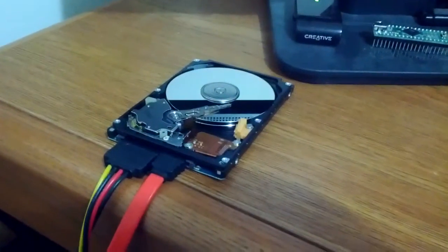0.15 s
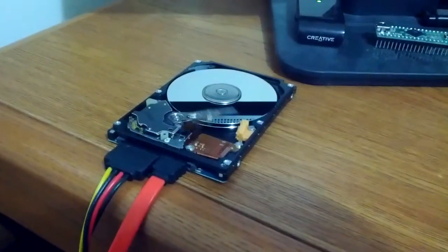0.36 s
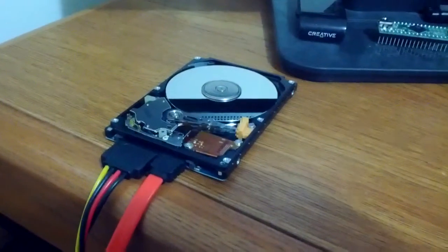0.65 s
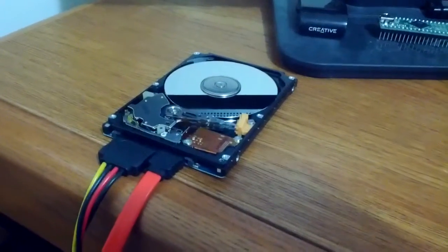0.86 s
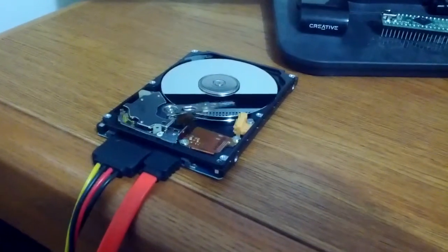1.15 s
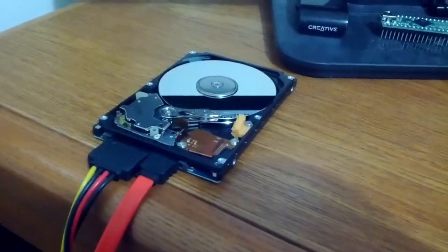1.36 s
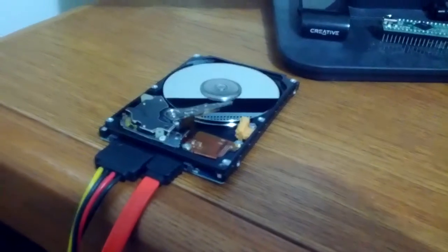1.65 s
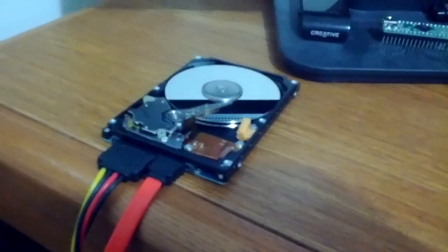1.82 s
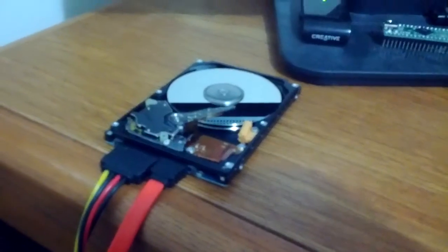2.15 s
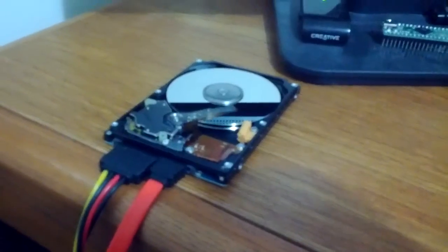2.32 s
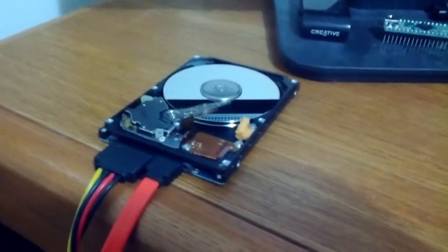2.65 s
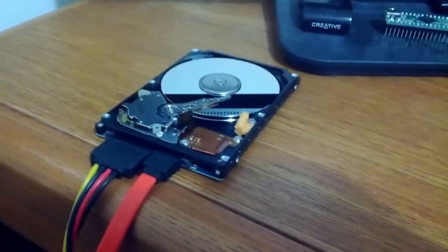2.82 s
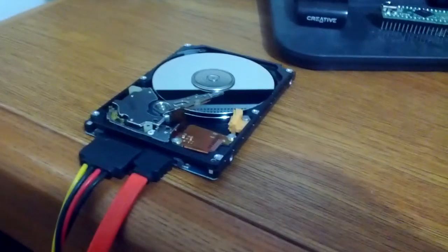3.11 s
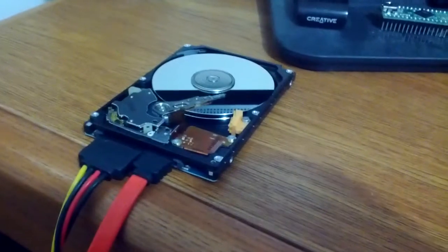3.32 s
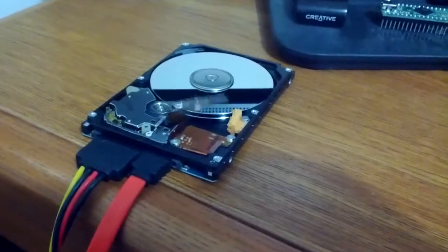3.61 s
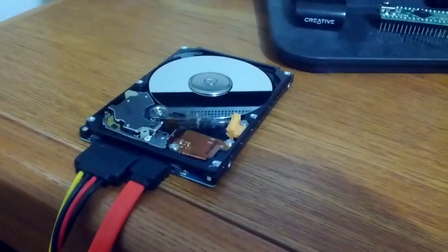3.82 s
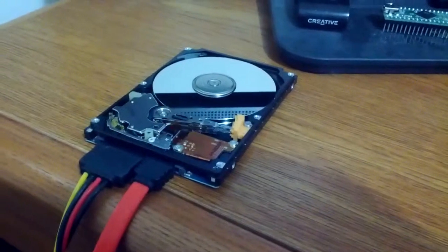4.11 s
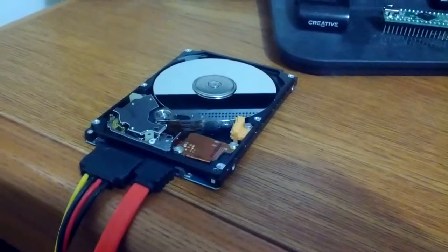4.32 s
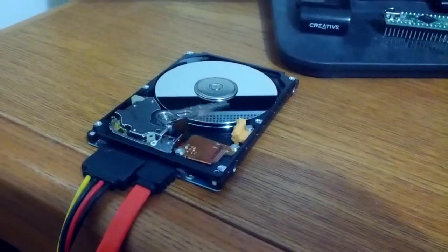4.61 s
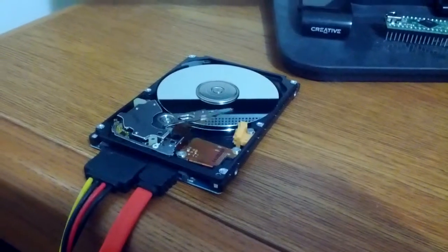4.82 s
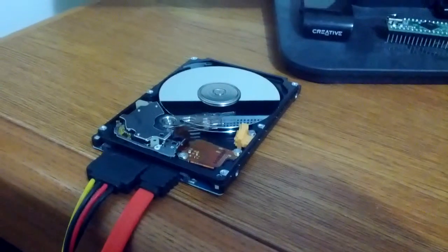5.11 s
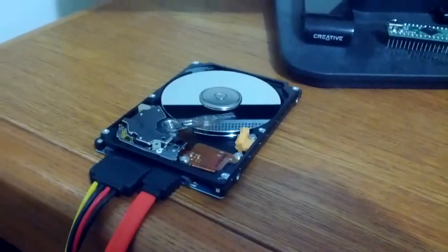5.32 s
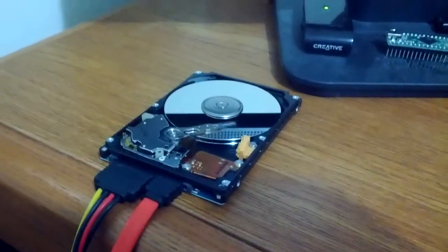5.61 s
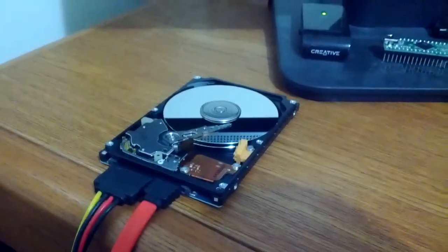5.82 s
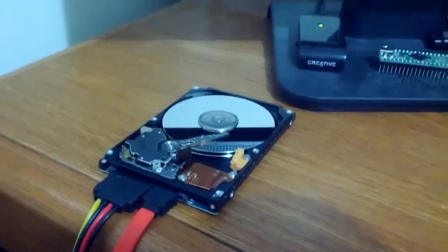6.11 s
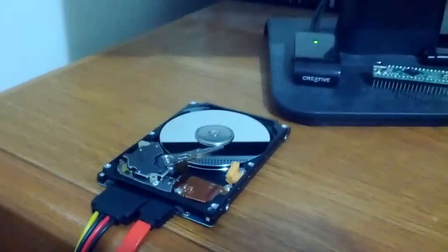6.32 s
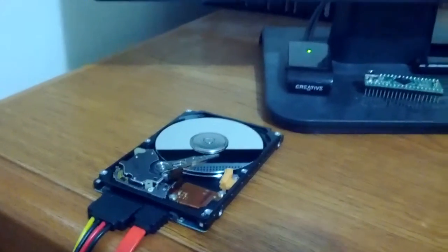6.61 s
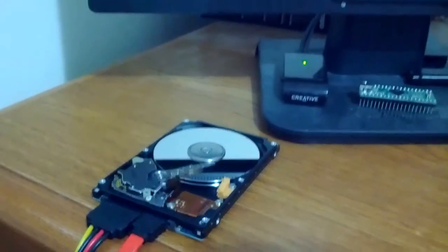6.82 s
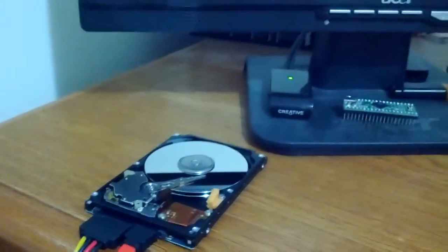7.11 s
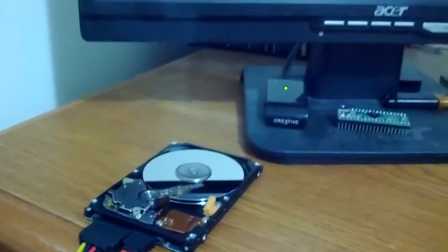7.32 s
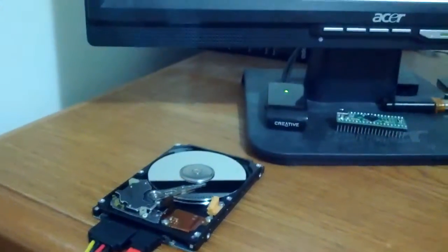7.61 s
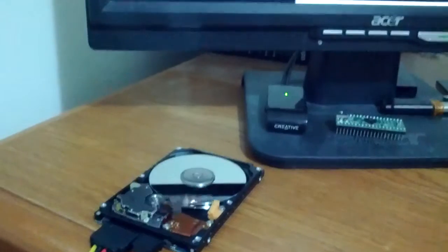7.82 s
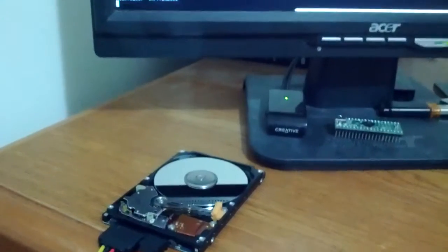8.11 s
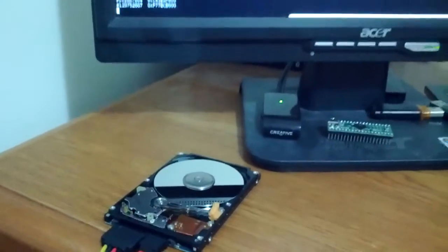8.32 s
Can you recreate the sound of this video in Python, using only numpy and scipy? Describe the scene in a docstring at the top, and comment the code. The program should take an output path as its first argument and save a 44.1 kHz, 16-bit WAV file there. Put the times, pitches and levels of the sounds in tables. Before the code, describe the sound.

An open hard drive knocks sharply about twice a second over a high scraping hiss, in three runs with quieter, whining pauses.

```python
"""An opened, failing hard drive, heard close up on a wooden desk beside a humming computer.
In three tries its heads scrape the platter, shaking their springs into a high hiss, while the arm
knocks on its stop and clacks as it turns round; each blow rings the arm and the casting.
Between tries the heads park: the motor whines, the arm ticks faintly and the coil chatters.
Fan hum, spindle rush and a few soft bumps lie underneath, and a small room answers the blows."""
import sys
import numpy as np
from scipy import signal
from scipy.fft import rfft, irfft, next_fast_len
from scipy.io import wavfile

SR = 44100
rng = np.random.default_rng(int(sys.argv[2]) if len(sys.argv) > 2 else 0)


def persist_wave(psi):
    """Save psi, clipped to +-1, as 16-bit WAV."""
    counts = np.round(np.clip(psi, -1, 1) * 32767).astype(np.int16)
    wavfile.write(sys.argv[1], SR, np.atleast_2d(counts).T)


N = 372761
TIME = np.arange(N) / SR
LIFT_S = 0.03  # the heads lift off this long before they reach the ramp

# The heads' tries on the platter. Each row: landing in seconds, return to the ramp in seconds,
# relative level in dB, settling time in seconds, time at the rim in seconds.
TRIES = [(-0.1, 0.484, -42.3, 0.005, 0.11), (1.484, 3.791, -42, 0.0062, 0.17),
         (5.589, 7.935, -42, 0.075, 0.13)]
# The arm hits its stop. Each row: start in seconds, relative level in dB, rebound in dB against
# the hit, rebound delay in seconds.
KNOCKS = [(0.2621, -15, -7.5, 0.0049), (1.804, -15.5, -8.5, 0.0057), (2.2382, -15.5, -13, 0.006),
          (2.6686, -15.5, -12, 0.0059), (3.0855, -16, -6.5, 0.006), (3.5142, -14.5, -7.5, 0.0064),
          (5.9387, -15.5, -9.5, 0.006), (6.361, -16, -8.5, 0.0054), (6.8002, -16.5, -9, 0.006),
          (6.9934, -27, -10, 0.0062), (7.247, -16.5, -7, 0.007), (7.6833, -17, -8, 0.0061)]
# The arm turns round or leaves its ramp. Each row: start in seconds, relative level in dB,
# change in the scraping in dB.
CLACKS = [(0.389, -28, -4), (0.4585, -29.5, 4), (1.489, -25.5, 1), (1.926, -31.5, -4.5),
          (2.3555, -25.5, -8), (2.7756, -26.5, -7), (3.202, -23.5, -0.5), (3.6387, -25.5, 0),
          (5.6263, -23, -8), (6.049, -26, -4), (6.4877, -30, 1), (6.9152, -34.5, -5), (6.935, -30.5, -13),
          (7.3682, -23, -0.5), (7.8158, -26.5, -7)]
# Modes of arm and casting. Each row: pitch in Hz, t60 in seconds before extra damping,
# then weight in dB in a knock, in a clack and in a tick.
MODES = [(594, 0.031, -33, -30, -30), (1096, 0.11, -22, -32, -26), (1209, 0.15, -30, -32, -19),
         (1458, 0.11, -23, -32, -32), (1662, 0.11, -23.5, -45, -31), (1750, 0.13, -25, -35, -44),
         (1865, 0.12, -31, -24.5, -38), (2313, 0.051, -13, -19, -41.5), (2397, 0.17, -22, -24, -32),
         (2470, 0.067, -10.5, -11.5, -28), (3180, 0.037, -9.5, -31, -24), (3340, 0.037, -17, -22, -22),
         (3653, 0.028, 0.5, -2.5, -8.5), (3786, 0.018, -1, -2, -13), (4000, 0.02, 5, 0, -6),
         (4350, 0.02, -5.5, 4, -13), (4750, 0.024, -8, -11, -20), (4976, 0.026, -14, 3.5, -21),
         (5290, 0.016, 0.5, -2.5, -9), (5550, 0.015, -1.5, -14, -4), (5920, 0.02, -5.5, -0.5, -6.5),
         (6390, 0.021, -4, -9, -12.5), (6953, 0.03, 5, -18, -15), (7330, 0.0094, 0, -18, -10),
         (7924, 0.021, -5, -2, -10), (8010, 0.021, -6, -2.5, 0.5), (8940, 0.059, -2.5, -7, -4),
         (9475, 0.038, -1, 5.5, -9), (9450, 0.014, -28, 2, 8.5)]
# Once parked, the arm runs the same routine of ticks and squeaks. Each entry: start in seconds.
ROUTINES = [0.5397, 3.9172, 8.0493]
# The drive hunts and its coil chatters. Each row: start in seconds, end in seconds.
HUNTS = [(1.06, 1.48), (4.46, 5.58)]


def gain_of(db):
    """Decibels to amplitude."""
    return np.exp(np.asarray(db) * (np.log(10) / 20))


def unit_rms(x):
    """Scales to rms 1."""
    return x / np.sqrt(np.mean(x ** 2) + 1e-20)


def eq_curve(points, hz):
    """Gain over frequency from rows of Hz and dB."""
    f, db = np.transpose(points)
    return gain_of(np.interp(np.log(hz + 1), np.log(f + 1), db))


def noise(count, gain):
    """Noise of rms 1, coloured by the function gain(Hz)."""
    size = next_fast_len(count)
    spectrum = rfft(rng.standard_normal(count), size) * gain(np.fft.rfftfreq(size, 1 / SR))
    return unit_rms(irfft(spectrum, size)[:count])


def wander(rate_hz):
    """Random drift of rms 1, moving at up to about the given rate."""
    steps = TIME * 2.5 * rate_hz
    return unit_rms(np.interp(steps, np.arange(N // 4), rng.standard_normal(N // 4)))


def add(mix, start, sound):
    """Drops a sound into the mix at a start in seconds."""
    part = mix[max(round(start * SR), 0):][:len(sound)]
    part += sound[:len(part)]


def during(start, end, glide_s):
    """Gate: 1 between two times, with a straight fade at each end."""
    return np.clip(np.minimum(TIME - start, end - TIME) / glide_s + .5, 0, 1)


def swell(start, attack_s, hold_s, release_s):
    """Envelope from 0 to 1 and back."""
    return np.interp(TIME - start, np.cumsum([0, attack_s, hold_s, release_s]), [0, 1, 1, 0])


def at_rim(glide_s=0.03):
    """Rises from 0 to 1 as the heads ride the rim at the end of each try."""
    return sum(swell(end - rim_s, glide_s, rim_s, glide_s) for _, end, _, _, rim_s in TRIES)


def turn_dips(glide_s=0.021):
    """Change of the scraping in dB, mostly a dip, as the arm turns round at the rim."""
    return sum(dip_db * swell(start, glide_s, 0, glide_s) for start, _, dip_db in CLACKS)


def head_contact(lift_t60=0.085, surge_db=3.5, rim_db=-4.5):
    """How hard the heads scrape: each knock shakes them into the platter; the rim is softer."""
    steady = np.zeros(N)
    for land, end, db, settle_s, _ in TRIES:
        landing = np.clip((TIME - land) / settle_s, 0, 1) ** 0.3
        lift_db = -60 * np.clip((TIME - end + LIFT_S) / lift_t60, 0, 2)
        steady += landing * gain_of(db + lift_db)
    hardest_db = max(knock[1] for knock in KNOCKS)
    surge = sum(gain_of(db - hardest_db) * swell(start, attack_s=0.01, hold_s=0.03, release_s=0.054)
                for start, db, _, _ in KNOCKS)
    return steady * gain_of(surge_db * surge + turn_dips() + rim_db * at_rim())


def head_scrape(gain_db=3, spin_hz=90, specks_per_s=90, whistle_db=2, hub_s=0.09):
    """Friction and specks shake the head springs; each swells on its own and with the arm's place."""
    # Resonances of head springs and platter. Each row: centre in Hz, width in Hz, weight in dB,
    # then its change in dB in the last try, near the hub and at the rim.
    springs = [(3700, 120, -25, -1, 3, 3), (4320, 130, -11, -1, -1, 4), (4490, 130, -9.5, -1, -1, 3),
               (5330, 600, -20, -1, 0, 2), (6300, 150, -13, -1, -1, 3), (6950, 280, -12, -1, 3, 2),
               (7590, 200, -17, -1, 0, 2), (8310, 190, -6, 0, -2, 4), (8940, 130, -3.5, -1, 0, -1),
               (9480, 210, 2, -2, 1.5, -4), (10140, 150, -2.5, 1, 0, -2), (10700, 130, -2, -3, -3, -3),
               (11480, 300, -16, -2, -1, 2), (12600, 130, 0, -5, -3, -4), (13300, 260, -14, 6, -3, 1),
               (14480, 400, -17, -3, 1, 9)]
    # Broad friction hiss under them. Each row: frequency in Hz, relative density in dB.
    friction_eq = [(1000, -42), (3000, -33.5), (4600, -26.5), (5950, -31.5), (6600, -15.5), (7300, -30.5),
                   (8000, -15.5), (9100, -9), (10400, -12.5), (11100, -17.5), (12000, -21.5),
                   (13000, -20.5), (16000, -19.5)]
    # fine grain, slower flutter and a slight ripple with each turn of the platter
    pressure_db = wander(1100) + 0.13 * wander(60) - 0.1 * np.sin(2 * np.pi * spin_hz * TIME)
    specks = 3 * rng.standard_normal(N) * (rng.random(N) < specks_per_s / SR)
    size = next_fast_len(N)
    f = np.fft.rfftfreq(size, 1 / SR)
    grit = rfft(rng.standard_normal(N) * gain_of(pressure_db) + specks, size)
    # the arm lingers near the hub after each knock
    hub = sum(np.interp(TIME - start, [0, hub_s / 2, hub_s], [1, 1, 0], left=0) for start, *_ in KNOCKS)
    deepest_dip_db = min(clack[2] for clack in CLACKS)
    rim = np.clip(at_rim() + turn_dips() / deepest_dip_db, 0, 1)
    last_try = TIME > TRIES[-1][0]
    hiss = irfft(grit * eq_curve(friction_eq, f), size)[:N]
    for hz, width, db, last_db, hub_db, rim_db in springs:
        spring = irfft(grit / (1 + (2 * (f - hz) / width) ** 2), size)[:N]
        spring_db = db + last_db * last_try + hub_db * hub + rim_db * rim
        hiss += spring * gain_of(spring_db + whistle_db * wander(16))
    return gain_of(gain_db) * head_contact() * unit_rms(hiss)


def wavering_tone(hz, width_hz):
    """A sine of rms 1 whose pitch drifts around hz."""
    pitch = hz + width_hz / 2 * wander(width_hz + 2)
    return np.sqrt(2) * np.sin(2 * np.pi * np.cumsum(pitch) / SR)


def motors(whine_hz=10799, switch_s=0.035, rumble_db=-54.5):
    """Fans and motor hum, the motor's switching whines, the spindle rushes and the room murmurs."""
    # Hum of fans and motor. Each row: pitch in Hz, level in dB, width in Hz.
    hum_lines = [(59.8, -62.5, 4), (133.2, -65.5, 10.15), (171, -71.5, 6.21), (224.2, -66.5, 12.02),
                 (435, -65, 1.446), (652, -68, 1.99), (1129, -73.5, 14), (5180, -81, 20), (6550, -77, 3.8),
                 (12958, -83, 5)]
    # Rush of the spindle. Each row: frequency in Hz, relative density in dB.
    rush_eq = [(1500, -8.5), (2800, -4), (3700, 1.5), (4400, 1), (5100, 4), (6100, -4), (7500, -3),
               (8700, -1.5), (10000, 1), (11200, -3.5), (13000, -7.5), (16000, -11)]
    # Rumble of room and spinning platter. Each row: frequency in Hz, relative density in dB.
    rumble_eq = [(12, -40), (20, 2), (45, -2.5), (59, -2), (85, -3), (119, -2.5), (214, -3.5), (325, -10),
                 (401, -11), (427, -9.5), (464, -18.5), (636, -11.5), (691, -14), (1140, -14),
                 (1740, -21.5), (3000, -27.5), (3900, -57), (6600, -120)]
    # Whine and rush fade as the microphone draws back. Each row: time in seconds, gain in dB.
    draw_back = [(5.6, 1), (8.05, 0.3), (8.45, -3.5)]
    hum = sum(gain_of(db) * wavering_tone(hz, width) for hz, db, width in hum_lines)
    hunting = sum(during(start, end, switch_s) for start, end in HUNTS)
    scraping = sum(during(land, end - LIFT_S, switch_s) for land, end, *_ in TRIES)
    parked = 1 - hunting - scraping
    whine = gain_of(-63 * parked - 68 * hunting - 76 * scraping) * wavering_tone(whine_hz, width_hz=12)
    rush = gain_of(-60 * parked - 58.7 * (1 - parked)) * noise(N, lambda f: eq_curve(rush_eq, f))
    rumble = gain_of(rumble_db + 0.5 * wander(2)) * noise(N, lambda f: eq_curve(rumble_eq, f))
    closeness = gain_of(np.interp(TIME, *np.transpose(draw_back)))
    return hum + closeness * (whine + rush) + rumble


def ring(mode_db, rise_s, crack_db, crack_t60, scatter_rad=0, damping=1):
    """One blow on the drive: the modes of arm and casting ring out over a short dense crack."""
    # The dense small modes that make the crack. Each row: frequency in Hz, relative density in dB.
    crack_eq = [(100, -6), (900, -6.5), (2000, -2), (3000, 1.5), (3800, -8), (7000, 10.5), (9500, 8.5),
                (11700, 5.5), (13000, -11), (16000, -10)]
    t = np.arange(SR // 8) / SR
    hz, t60 = np.transpose(MODES)[:2, :, None]
    uneven, detune, phase = rng.standard_normal((3, len(MODES), 1))
    decays = gain_of(np.array(mode_db)[:, None] + 0.8 * uneven - 60 * damping * t / t60)
    partials = decays * np.sin(2 * np.pi * hz * (1 + 0.0031 * detune) * t + scatter_rad * phase)
    polarity = (-1) ** np.arange(len(MODES))
    attack_rms = np.linalg.norm(partials[:, :SR // 300].std(1))
    metal = polarity @ partials / attack_rms
    crack = noise(len(t), lambda f: eq_curve(crack_eq, f)) * gain_of(crack_db - 60 * t / crack_t60)
    return (metal + crack) * (1 - np.exp(-(t / rise_s) ** 2))


def arm_knocks(gain_db=-4, last_touch_db=-17):
    """The arm strikes its stop, rebounds loosely and settles with a last light touch."""
    out = np.zeros(N)
    mode_db = [mode[2] for mode in MODES]
    for start, db, rebound_db, delay in KNOCKS:
        # pressed against the stop, the arm damps the first ring
        hit = ring(mode_db, rise_s=0.00095, crack_db=-5.5, crack_t60=0.019, damping=1.15)
        add(out, start, gain_of(db + gain_db) * hit)
        for lag, touch_db in (delay, rebound_db), (1.8 * delay, last_touch_db):
            touch = ring(mode_db, rise_s=0.0013, crack_db=-5.5, crack_t60=0.072, scatter_rad=6.095)
            add(out, start + lag, gain_of(db + gain_db + touch_db) * touch)
    return out


def soft_bumps():
    """Dull puffs and swells of band-limited noise."""
    # Each row: start in seconds, length in seconds, centre in Hz, width in Hz, level in dB.
    puffs = [(.38, 0.067, 131, 48, -50.5), (.46, 0.12, 190, 140, -51), (1.747, .018, 1710, 2100, -50),
             (1.992, 0.028, 380, 740, -52), (2.14, 0.072, 201, 110, -51.5), (3.65, 1.3, 172, 9.2, -58.5),
             (4.925, 0.013, 330, 440, -51), (5.07, .1, 199, 150, -49), (5.47, 0.02, 330, 330, -50.5),
             (5.92, 0.022, 350, 730, -47), (6.39, 0.13, 132, 28, -51)]
    out = np.zeros(N)
    for start, length, hz, width, db in puffs:
        band = noise(2 * SR, lambda f: 1 / (1 + (2 * (f - hz) / width) ** 4))[:int(length * SR)]
        add(out, start, gain_of(db) * unit_rms(band) * np.hanning(len(band)))
    return out


def rattles(events, blow, length_s, gain_db, bounce_db, bounces=4):
    """Each event (seconds, dB) is one contact followed by a few weaker ones as the arm shakes."""
    out = np.zeros(N)
    for start, db in events:
        add(out, start, gain_of(db + gain_db) * blow)
        for share in (np.arange(bounces) + rng.random(bounces)) / bounces:
            add(out, start + share * length_s, gain_of(db + gain_db + bounce_db - 8.3 * share) * blow)
    return out


def arm_clacks():
    """The arm rattles as it turns round or leaves its ramp."""
    blow = ring([mode[3] for mode in MODES], rise_s=0.00082, crack_db=-5, crack_t60=0.028, damping=1.17)
    return rattles([clack[:2] for clack in CLACKS], blow, length_s=0.008, gain_db=-7.5, bounce_db=-5.5)


def arm_ticks():
    """The arm touches its ramp after each try, then twitches through its routine."""
    # Light twitches. Each row: seconds into the routine, relative level in dB.
    twitches = [(0, -39.5), (0.2287, -34), (0.3304, -39.5), (0.401, -32)]
    blow = ring([mode[4] for mode in MODES], rise_s=0.0007, crack_db=-1, crack_t60=0.012, damping=1.7)
    events = [(end, -35) for _, end, *_ in TRIES]
    events += [(start + lag, db) for start in ROUTINES for lag, db in twitches]
    return rattles(events, blow, length_s=0.0042, gain_db=-9, bounce_db=-5)


def squeak(length_s, hz, rough=0.086):
    """A short swelling tone, roughened by a drifting phase."""
    t = np.arange(int(length_s * SR)) / SR
    drift = rough * np.cumsum(rng.standard_normal(SR // 10))[:len(t)]
    return np.sqrt(2) * np.sin(np.pi * t / length_s) * np.sin(2 * np.pi * hz * t + drift)


def voice_coil(steps_per_s=38, jitter_s=0.006, uneven_db=1.5):
    """The coil squeaks on single moves and chatters in quick uneven steps while hunting."""
    # Single squeaks. Each row: seconds into the routine, length in seconds, pitch in Hz, level in dB.
    chirps = [(-0.003, 0.018, 4160, -52), (0.16, 0.01, 12060, -55), (0.345, 0.04, 10100, -55),
              (0.348, 0.036, 5600, -66)]
    out = np.zeros(N)
    for start in ROUTINES:
        for lag, length, hz, db in chirps:
            add(out, start + lag, gain_of(db) * squeak(length, hz))
    for start, end in HUNTS:
        steps = np.arange(start, end, 1 / steps_per_s)
        for step, chance in zip(steps, rng.standard_normal((len(steps), 5))):
            late, top_accent, accent, mid_bend, body_bend = chance
            when = step + jitter_s * late
            top = squeak(0.01, 12060, rough=0.1)
            mid = squeak(0.009, 9500 * (1 + 0.04 * mid_bend), rough=0.2)
            body = squeak(0.009, 4700 * (1 + 0.1 * body_bend), rough=0.25)
            add(out, when, gain_of(-63.5 + uneven_db * top_accent) * top)
            add(out, when, gain_of(-60 + uneven_db * accent) * mid)
            add(out, when, gain_of(-62 + uneven_db * accent) * body)
    return out


def room(x, near_db=-8.5, near_t60=0.083, far_db=-15.5, far_t60=0.41, dull_hz=5000):
    """Dulled echoes: desk and monitor scatter the sound at once, and the small room rings on."""
    out = np.zeros(N)
    t = np.arange(SR // 2) / SR
    pole = np.exp(-2 * np.pi * dull_hz / SR)
    # four echo patterns crossfade as the microphone moves
    for place in np.linspace(0, 1, num=4):
        near, far = rng.standard_normal((2, len(t)))
        near = unit_rms(near * gain_of(-60 * t / near_t60) * (t > 0.002))
        far = unit_rms(far * gain_of(-60 * t / far_t60) * (t > 0.009))
        echoes = (gain_of(near_db) * near + gain_of(far_db) * far) / np.sqrt(len(t))
        echoes = signal.lfilter([2 * (1 - pole)], [1, -pole], echoes)
        crossfade = np.cos(np.pi / 2 * np.clip(3 * abs(TIME / TIME[-1] - place), 0, 1))
        out += signal.oaconvolve(x * crossfade, echoes)[:N]
    return out


def scene():
    """The arm's blows in the room, over scraping, coil, motors and soft bumps, in mono."""
    arm = arm_knocks() + arm_clacks() + arm_ticks()
    return (arm + room(arm) + head_scrape() + voice_coil() + motors() + soft_bumps())[None]


def record(dry):
    """A steep low-pass takes off the air above 15.8 kHz."""
    low_pass = signal.firwin(511, 15800, window=("kaiser", 9), fs=SR)
    return signal.oaconvolve(dry, low_pass[None], "same")


dry = scene()
out = record(dry)
persist_wave(out)
```